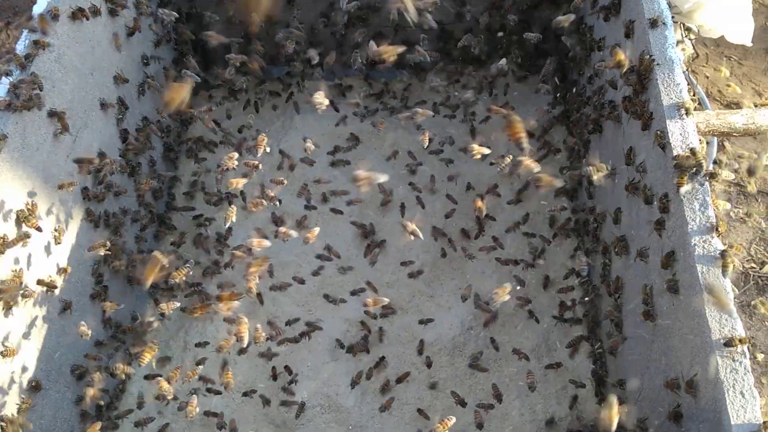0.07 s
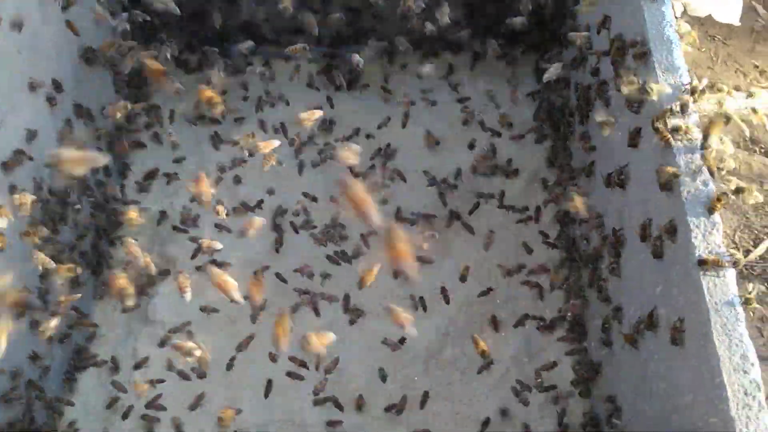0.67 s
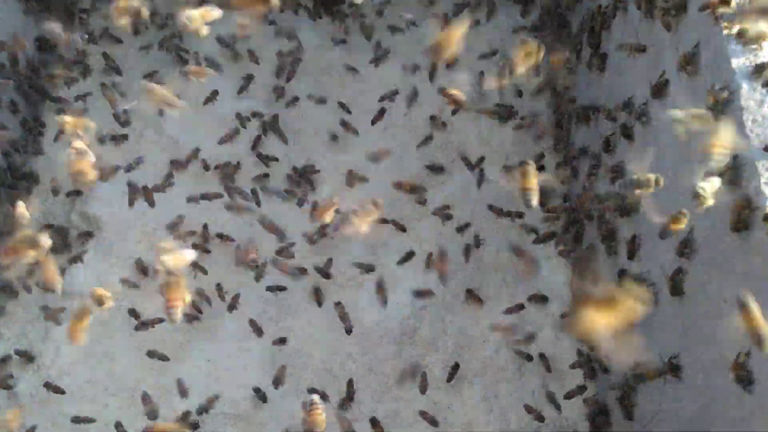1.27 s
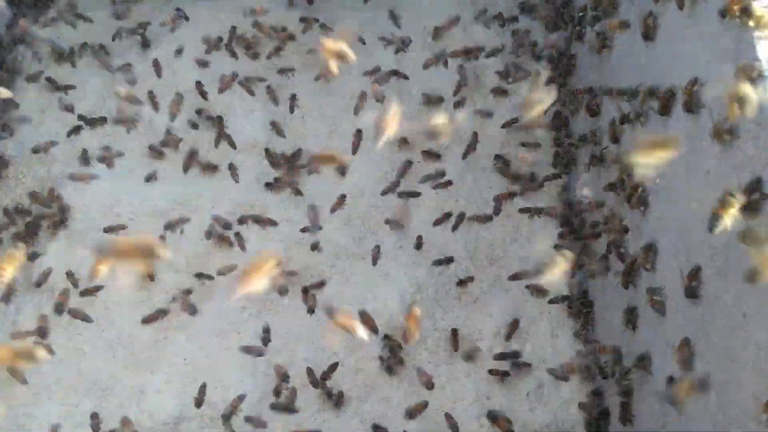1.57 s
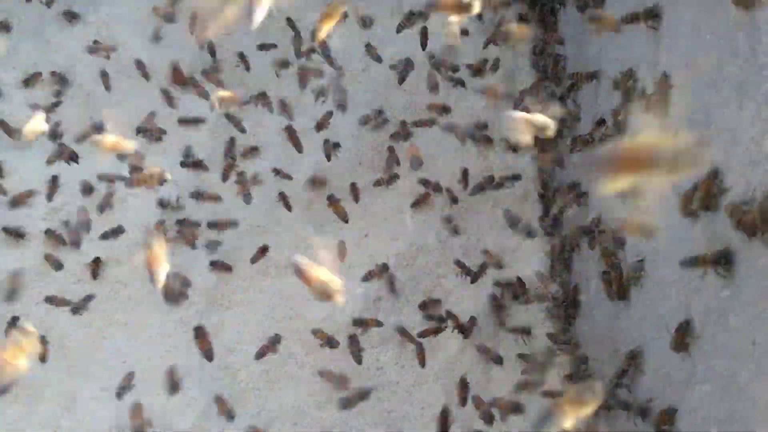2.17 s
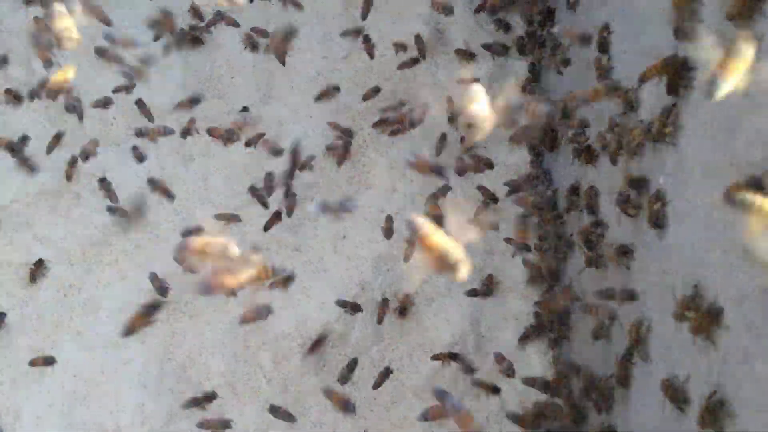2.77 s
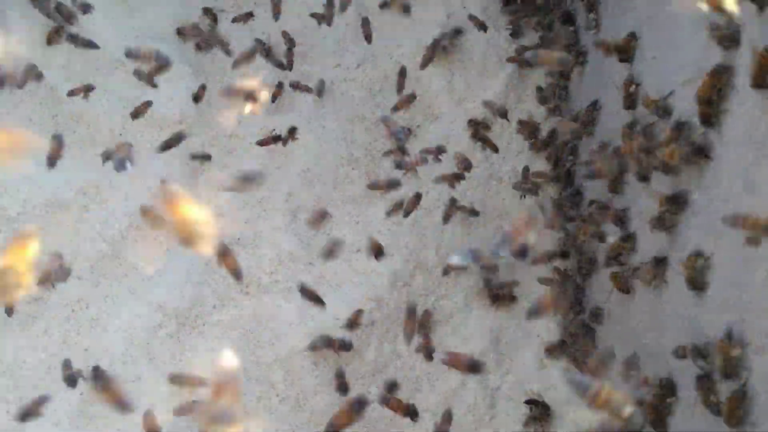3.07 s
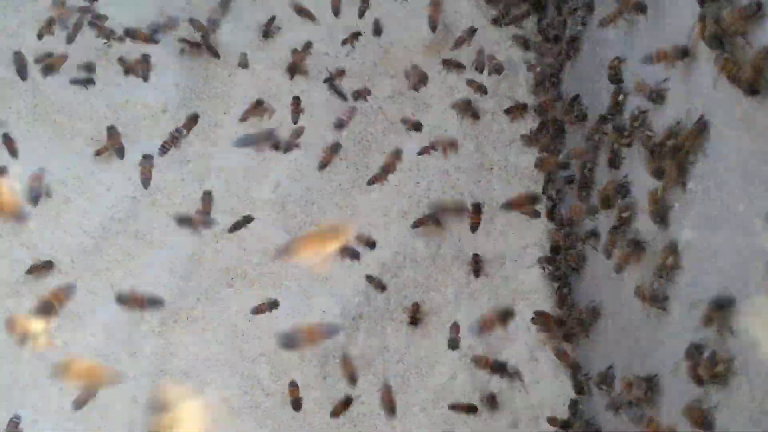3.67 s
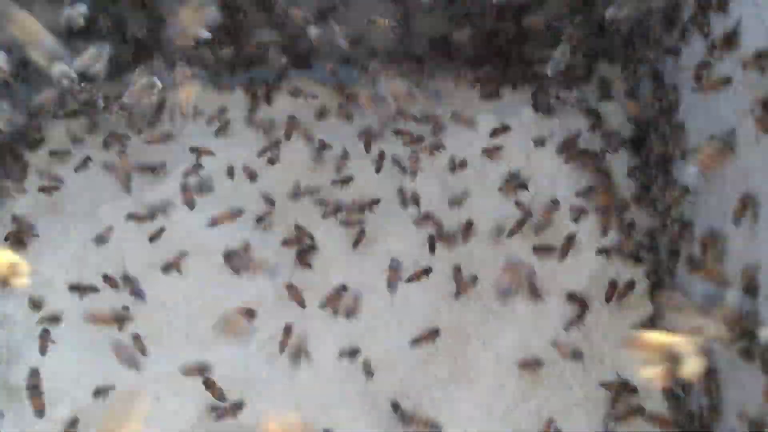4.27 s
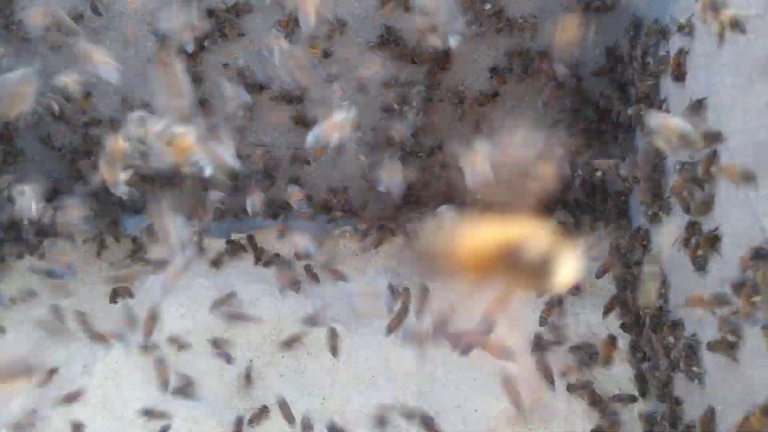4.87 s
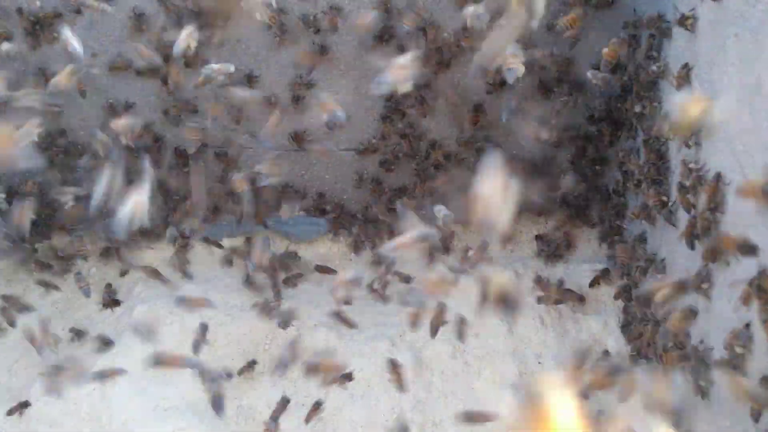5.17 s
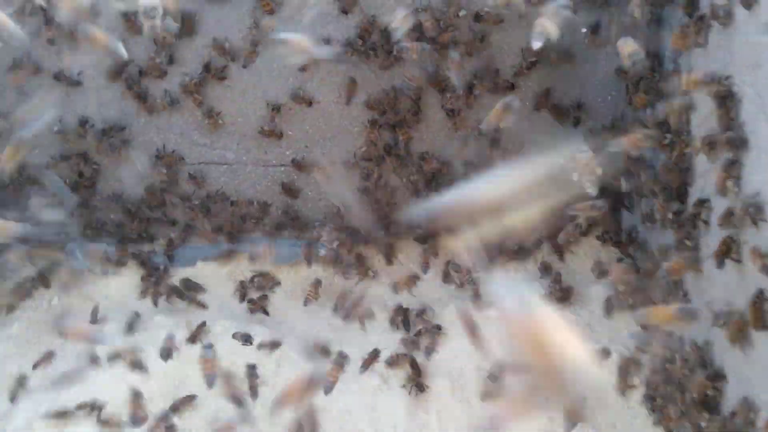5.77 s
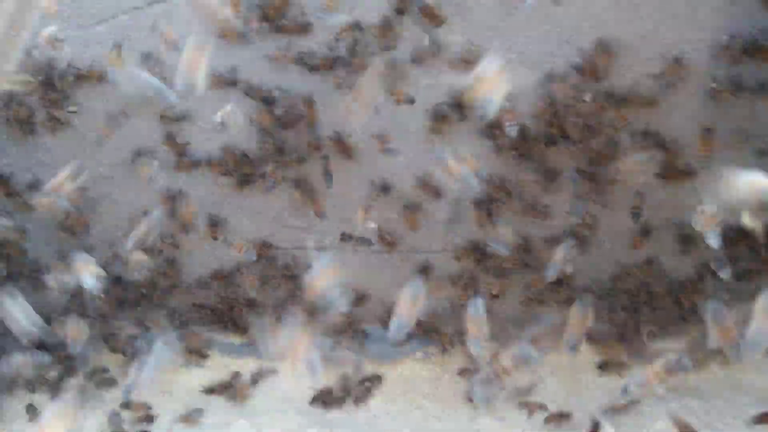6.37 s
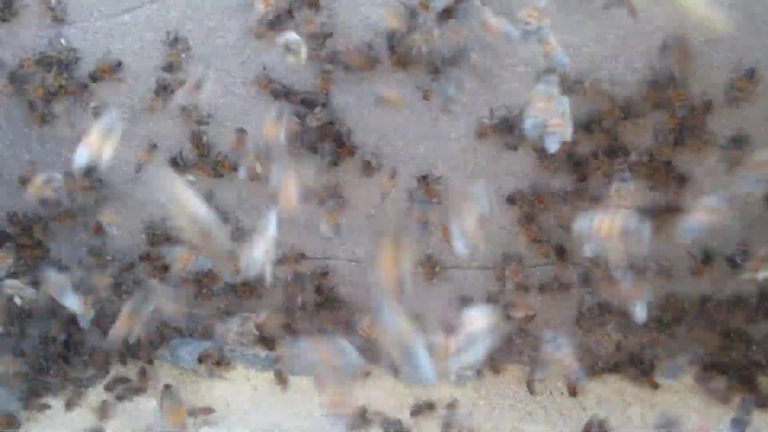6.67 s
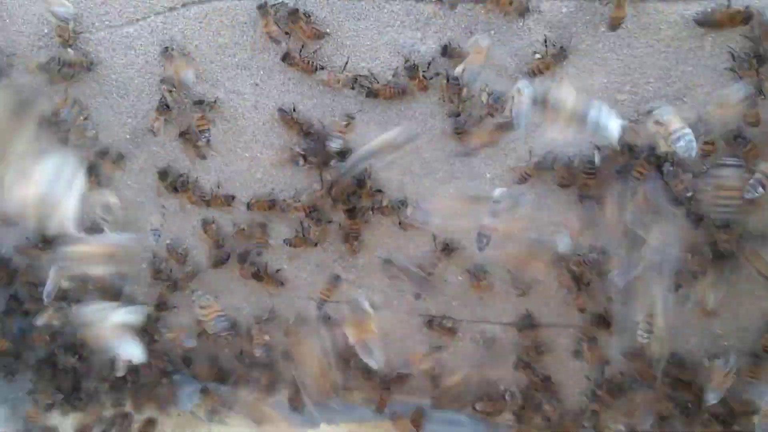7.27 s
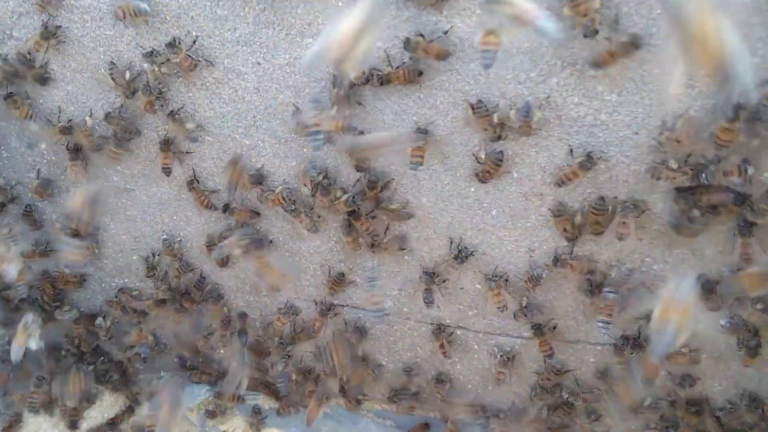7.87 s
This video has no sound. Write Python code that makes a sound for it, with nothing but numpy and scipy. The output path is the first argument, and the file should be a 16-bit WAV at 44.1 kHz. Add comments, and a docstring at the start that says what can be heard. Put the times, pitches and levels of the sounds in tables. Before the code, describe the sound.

A dense swarm of honeybees buzzes all around, with single bees zipping close and puffing air against the microphone.

```python
"""A thick hum of honeybees fills an open box: dozens of wingbeats merging around a camera held among them.
Single bees swing close by, puff air into its two microphone ports (left and right), and one bumps a port.
Behind them, wings hiss, crawling feet tick faintly and stirred air rumbles.
The camera widens the stereo sound by subtracting some of each port from the other. Its gain control
turns everything down at a bump, hard puff or close bee, and the swarm then swells back."""
import sys
import numpy as np
from scipy import signal
from scipy.fft import rfft, irfft, next_fast_len
from scipy.io import wavfile
from scipy.ndimage import uniform_filter1d, map_coordinates

SR = 44100
rng = np.random.default_rng(int(sys.argv[2]) if len(sys.argv) > 2 else 0)


def master_out(mix):
    """Clip the mix to full scale and print it as 16-bit PCM to the path in sys.argv[1]."""
    frames = np.transpose(np.atleast_2d(mix))
    ceiling = np.clip(frames, -1, 1)
    pcm = np.round(ceiling * 32767).astype(np.int16)
    wavfile.write(sys.argv[1], SR, pcm)


N = 353241
TIME = np.arange(N) / SR
SLOW_TIME = np.linspace(0, TIME[-1], 2000)  # coarse steps for slow changes

# The swarm thickens as the camera sinks into the box. Each row: time in seconds, buzz in dB, hiss in dB.
SWARM_LEVELS = [(0.3, -25, -39), (1.2, -22.5, -37), (1.8, -22, -35.5), (2.3, -22, -35.5), (2.9, -20, -32),
                (3.3, -20, -32), (3.7, -20, -32), (3.95, -19.5, -30.5), (4.3, -20.5, -33),
                (4.6, -20, -31.8), (5.6, -20, -32.5), (5.85, -21.5, -33.5), (6.3, -22.5, -33.5),
                (7.05, -19.5, -30.5), (7.5, -23, -33), (8.0, -20, -30)]
# How much the deep hum is boosted within the buzz. Each row: time in seconds, boost in dB.
HUM_BOOST = [(0.3, -10), (1.0, -8.5), (1.7, -6.5), (2.8, -3.5), (3.3, 0.5), (3.9, 2), (4.6, -5), (5.05, -5),
             (5.45, -2), (6.2, 1.5), (6.9, -2.5), (7.4, 1.5), (8.0, 0)]
# Stirred air reaching the ports. Each row: time in seconds, level in dB.
DRAUGHT_LEVELS = [(0.3, -49), (1.1, -58), (1.9, -55), (2.35, -41), (2.62, -47), (3.1, -31), (3.6, -25),
                  (3.8, -30), (4.1, -35), (4.5, -51), (5.2, -43), (5.8, -49), (6.3, -48), (6.6, -39),
                  (7.2, -45), (7.55, -42), (8.0, -43)]

# Bees brushing past. Each row: time in seconds, half length in seconds, dB above the hiss, centre in Hz.
BRUSH_EVENTS = [(0.373, 0.026, -7, 8000), (3.372, 0.055, -3, 9000), (3.46, 0.05, -9.5, 4000),
                (3.996, 0.029, -9, 3800), (4.12, 0.087, -13, 7000)]
# Wing air blown into a port. Each row: time in seconds, half length in seconds, eddy (air swirl) pitch
# in Hz, level in dB, left minus right in dB.
PUFF_EVENTS = [(0.412, 0.011, 129, -20.5, 22), (0.454, 0.012, 100, -24.5, -18),
               (1.746, 0.014, 105, -20.5, -23), (2.124, 0.01, 85, -23, 22), (2.183, 0.013, 85, -25, -21),
               (2.227, 0.011, 85, -30, -19), (2.514, 0.011, 85, -34, -16), (2.778, .01, 90, -29, -16),
               (2.975, 0.014, 181, -13, -26), (3.008, 0.0095, 205, -7, -28), (3.02, 0.0066, 332, -6.5, -32),
               (3.029, 0.02, 100, -11, -25), (3.081, 0.022, 184, -10.5, -21), (3.165, 0.015, 130, -16, -20),
               (3.286, 0.018, 107.7, -19.5, -20), (3.35, .011, 99, -22, -18), (3.45, 0.052, 174, -14, 30),
               (3.509, 0.013, 105, -13, -17), (3.545, 0.019, 183, -8.5, -19), (3.635, .008, 200, -13, 20),
               (3.68, 0.023, 129, -7.5, -23), (3.863, 0.011, 99, -22, 20.5), (3.944, 0.014, 111, -17, -15),
               (4.135, 0.0085, 164, -15.5, 23), (4.292, 0.01, 85, -31, 15), (4.37, 0.014, 85.2, -31, 14),
               (4.571, 0.013, 85, -32, 16), (4.693, 0.0074, 99, -24.5, 17), (5.042, 0.023, 70, -39, 16),
               (5.22, 0.036, 80, -35, -16), (5.501, 0.013, 102, -24, 22), (5.553, 0.016, 101, -25, 22),
               (6.023, .015, 80, -31, -18), (6.441, 0.0094, 85, -34, 16), (6.788, 0.0088, 85, -31, 18),
               (6.954, 0.0096, 100, -24, -18), (7.023, 0.0079, 103, -28, -18), (7.116, 0.017, 90, -28, 20),
               (7.333, 0.025, 110, -24, -18), (7.423, 0.031, 136, -23, 19), (7.483, 0.019, 115, -20, -20),
               (7.536, .015, 128, -27, 23), (7.632, 0.02, 100, -42, -20), (7.847, 0.006, 260, -13, -23),
               (7.869, 0.016, 157, -9, -17)]
# Bees passing close. Each row: time, approach and departure in seconds, wingbeat in Hz, glide in Hz per
# second, level in dB, left minus right in dB, brightness in dB per octave.
CLOSE_PASSES = [(0.385, 0.023, 0.02, 254.3, -19, -23.5, 13, 0),
                (1.356, 0.013, 0.015, 261.5, -27, -24.5, 6, 4.5),
                (1.61, 0.036, 0.025, 249.2, 10, -27, 5, -1), (1.715, 0.039, 0.03, 252, -20.5, -21, 4, -1),
                (1.83, 0.073, .1, 246.2, 19, -28, 15, -2), (2.04, 0.049, 0.035, 263, 39, -27, 30, 0),
                (2.402, 0.066, 0.049, 239.4, -115, -12.5, 44, -0.5),
                (2.789, 0.024, 0.018, 238, 40, -26.5, -7, 1), (2.908, 0.016, 0.011, 247, 0, -18, 6, -0.5),
                (2.95, 0.021, 0.081, 268, 20, -16.5, -13, 0.5),
                (5.23, 0.06, 0.041, 241, 60.5, -20.5, -12, -3), (5.329, 0.041, 0.018, 254, -30, -18, 4, -9),
                (5.47, .03, .02, 250, 11, -22, 8, -14), (5.535, .02, 0.031, 268, 10.5, -21, 12, -4),
                (5.61, 0.074, 0.021, 260.8, -2.5, -32, 6, 9), (5.8, 0.022, .04, 267, 19.5, -14.5, 12, -5),
                (5.968, 0.085, 0.051, 262.2, -14.5, -8.5, 34, 0.5),
                (6.745, 0.03, 0.023, 236, 38, -23.5, -32, -3),
                (7.02, 0.049, 0.038, 270.4, -41.5, -29, -26, 1),
                (7.255, 0.035, 0.028, 286, 41, -20, -23, -3.5),
                (7.33, 0.058, 0.046, 275, -60, -19.5, -43, -1), (7.72, 0.042, 0.028, 252, -1, -25.5, -9, 1),
                (7.82, 0.031, 0.03, 254, -39.5, -21, -30, -5), (7.91, 0.02, 0.032, 258, -30, -16, -30, -14)]

# The tone colour of each sound. Each row: frequency in Hz, relative level in dB.
HISS_TONE = [(70, -21), (140, 3), (220, 11), (370, 8.5), (600, 8), (900, 10), (2000, 0.5), (2900, -1.5),
             (3700, -1), (5000, 1), (7500, -3.5), (9000, -1), (10000, -2.5), (11500, 2), (14000, -1.5)]  # air hissing off wings
RUMBLE_TONE = [(15, -32), (35, -14), (65, -2.5), (100, -5.5), (170, -2.5), (330, -12), (700, -60),
               (2000, -90)]  # big eddies
FLUTTER_TONE = [(30, -28), (100, -27), (170, 2), (300, -2), (550, 0), (1000, -43.5), (2500, -68),
                (6000, -90)]  # small eddies
SWARM_TONE = [(140, -26), (195, 10.5), (255, 0.2), (400, 6), (500, -1.5), (570, -2), (750, -9), (1000, -11),
              (1500, -12.5), (2000, -18), (2500, -17), (3500, -26), (5000, -29)]  # filter over the whole swarm
SIDE_TONE = [(250, -0.5), (500, 1), (750, -4), (1050, -2), (1400, 6.5), (1800, 8), (2300, -1.5)]  # filter over the part of the swarm that differs between the ports
CLOSE_BEE_TONE = [(250, 4), (500, 0.5), (780, -9), (1050, -15.5), (1600, -21.5), (2500, -34), (5000, -54)]  # one close bee
# The tone colour of a puff. Each row: multiple of the eddy pitch, relative level in dB.
PUFF_TONE = [(.2, -17.5), (.6, -1.5), (1, 2.5), (1.5, -10), (2.5, -12.5), (4, -27.5), (8, -44), (20, -90)]

# The left port is duller. Each row: frequency in Hz, left minus right in dB.
PORT_TONE = [(300, 0), (1000, -3), (1800, -9), (3200, 0), (6000, -3), (9000, -5), (14000, -7)]
# Stereo widening. Each row: frequency in Hz, share of the other port to subtract.
CROSSFEED_SHARE = [(100, 0.85), (1200, 0.88), (3700, 0.58), (6200, 0.23), (10000, 0.071)]


def amp(db):
    """Turn decibels into a gain."""
    return 10 ** (np.asarray(db) / 20)


def unit(x):
    """Scale x to an average (rms) level of 1."""
    return x / np.sqrt(np.mean(x ** 2) + 1e-20)


def along(points, hz):
    """Read a table between its rows, on a log frequency scale."""
    row_hz, values = np.transpose(points)
    return np.interp(np.log(hz + 1), np.log(row_hz + 1), values)


def curve(rows, column=1):
    """Stretch a column of a time table to one value per sample."""
    columns = np.transpose(rows)
    return np.interp(TIME, columns[0], columns[column])


def drift(rate):
    """A smooth random curve on the coarse steps, through `rate` random values a second."""
    return map_coordinates(rng.standard_normal(size=1024), [SLOW_TIME * rate], mode="wrap")


def wobble(rate):
    """A drift with one value per sample."""
    return np.interp(TIME, SLOW_TIME, drift(rate))


def filtered(x, response):
    """Multiply each frequency in x by response(hz)."""
    size = next_fast_len(N + SR // 4)
    return irfft(rfft(x, size) * response(np.fft.rfftfreq(size, 1 / SR)), size)[..., :N]


def coloured(x, tone):
    """Give x a tone colour and an average level of 1."""
    return unit(filtered(x, lambda hz: amp(along(tone, hz))))


def pan(db):
    """Left and right gains, db apart, with constant total power."""
    gains = amp(np.array([db / 2, -db / 2])).reshape(2, -1)
    return gains / np.sqrt(np.mean(gains ** 2, axis=0))


def rustle(tick_db=-13, ticks_per_s=220, flicker_db=0.8):
    """Air hisses off the wings; feet and wings tick against the walls."""
    air = coloured(rng.standard_normal((2, N)), HISS_TONE) * amp(flicker_db * wobble(25))
    contacts = (rng.random((2, N)) < ticks_per_s / SR) * rng.standard_normal((2, N))
    ticks = amp(tick_db) * coloured(contacts, HISS_TONE)
    return amp(curve(SWARM_LEVELS, column=2)) * (air + ticks)


def brushes(width_octaves=0.77):
    """A bee brushing past makes a short, high swish."""
    out = np.zeros((2, N))
    for at, half, db, centre_hz in BRUSH_EVENTS:
        noise = rng.standard_normal((2, N))
        swish = filtered(noise, lambda hz: np.exp(-(np.log2((hz + 1) / centre_hz) / width_octaves) ** 2 / 2))
        swell = np.exp(-((TIME - at) / half) ** 2 / 2)
        out += amp(db) * unit(swish) * swell
    return amp(curve(SWARM_LEVELS, column=2)) * out


def draught(flutter_db=-1, breakup_db=-20, gust_db=4):
    """Wing air rumbles at each port in random gusts; a strong draught breaks into small, bright eddies."""
    db = curve(DRAUGHT_LEVELS) + gust_db * wobble(14)
    lumps = amp(1.9 * np.array([wobble(45), wobble(40)]))
    rumble = unit(lumps * coloured(rng.standard_normal((2, N)), RUMBLE_TONE))
    flutter = unit(lumps * coloured(rng.standard_normal((2, N)), FLUTTER_TONE))
    breakup = np.tanh(amp(db - breakup_db))
    return amp(db) * (rumble + amp(flutter_db) * breakup * flutter)


def puffs(smooth_s=0.011, size=16384):
    """A bee right at a port blows a short blast: an even stream of eddies that swells and fades."""
    out = np.zeros((2, N))
    hz = np.fft.rfftfreq(size, 1 / SR)
    for at, half, eddy_hz, db, side_db in PUFF_EVENTS:
        near = np.flatnonzero(abs(TIME - at) < size / SR / 2)[:size]
        swell = np.exp(-((TIME[near] - at) / half) ** 2 / 2)
        spectrum = rfft(rng.standard_normal(size)) * amp(along(PUFF_TONE, hz / eddy_hz))
        eddies = unit(irfft(spectrum))
        power = uniform_filter1d(abs(signal.hilbert(eddies)) ** 2, int(smooth_s * SR))
        even_stream = eddies / np.sqrt(power)
        blast = swell * even_stream[:len(near)]
        out[:, near] += amp(db) * pan(side_db) * blast * np.linalg.norm(swell) / np.linalg.norm(blast)
    return out


def knock(at_s=2.960, pitch_hz=228, db=3, side_db=-34):
    """A bee bumps the right port: one dry, low push with no ring."""
    phase_squared = (np.pi * pitch_hz * (TIME - at_s)) ** 2
    return amp(db) * pan(side_db) * (1 - 2 * phase_squared) * np.exp(-phase_squared)


def close_bees(turn_db_per_octave=1.8, jitter=0.01, shimmer_db=1.6, harmonic_count=14):
    """A close bee swells as it nears and fades as it veers off, its pitch gliding as it turns."""
    out = np.zeros((2, N))
    steering = .008 * wobble(35)
    waver = steering + jitter * wobble(150)
    stroke_gain = amp(shimmer_db * wobble(110))  # no two wing strokes are quite alike
    harmonics = np.arange(1, harmonic_count + 1)[:, None]
    for at, approach, departure, wing_hz, glide, db, side_db, brightness in CLOSE_PASSES:
        near = abs(TIME - at) < .7
        t = TIME[near] - at
        beats = np.cumsum((wing_hz + glide * t) * (1 + waver[near])) / SR
        progress = t / np.where(t < 0, approach, departure)
        tilt = brightness + turn_db_per_octave * np.tanh(progress)  # dull head-on, brighter from behind
        gains = amp(along(CLOSE_BEE_TONE, wing_hz * harmonics) + np.log2(harmonics) * tilt)
        phases = 2 * np.pi * harmonics * beats + 0.53 * rng.standard_normal((harmonic_count, 1))
        tone = (gains * np.cos(phases)).sum(axis=0) / np.sqrt((gains ** 2).sum(axis=0) / 2)
        swell = (1 + progress ** 2 / 2) ** -2
        out[:, near] += amp(db) * pan(side_db) * swell * stroke_gain[near] * tone
    return out


def wingbeat(harmonic_count=18, scatter_db=2, scatter_radians=1.097, size=2048):
    """One wingbeat is a pressure pulse; its harmonics get random levels and phases."""
    gains = amp(scatter_db * rng.standard_normal(harmonic_count))
    phases = scatter_radians * rng.standard_normal(harmonic_count)
    return unit(irfft(np.r_[0, gains * np.exp(1j * phases)], size))


def flying_bee(wing_hz, side_db):
    """One bee of the swarm: its pitch wanders as it steers, its loudness as it comes and goes."""
    hz = wing_hz * np.exp(.05 * np.tanh(.9 * drift(6)) + .016 * drift(30))
    beats = np.interp(TIME, SLOW_TIME, np.cumsum(hz) * SLOW_TIME[1] + rng.random())
    nearness_db = 8.5 * np.tanh(0.69 * drift(7))
    facing_db = 1.8 * drift(30)  # wings beam their sound, so it flickers as the bee swerves
    cycle = wingbeat()
    lag_s = 4e-5 + 1.5e-4 * rng.standard_normal()  # its direction sets the delay at the right port
    port_beats = np.array([beats, beats - lag_s * wing_hz])
    buzz = cycle[(port_beats * len(cycle)).astype(int) % len(cycle)]
    return buzz * pan(side_db) * np.interp(TIME, SLOW_TIME, amp(nearness_db + facing_db))


def swarm(wing_hz=255.1, spread=.046, slow_tail=.005, sides_db=7, count=56):
    """Many bees beat their wings at nearly one rate, a few slower; their harmonics merge into a rasp."""
    haste = unit(np.arctanh(.93 * np.linspace(-1, 1, count)))
    rates = wing_hz * np.exp(spread * haste - slow_tail * np.minimum(haste, 0) ** 2)
    left, right = sum(flying_bee(hz, side_db=(-1) ** k * sides_db * abs(rng.standard_normal()))
                      for k, hz in enumerate(rates))
    middle = left + right
    side = filtered(left - right, lambda hz: amp(along(SIDE_TONE, hz)))
    buzz = coloured(np.array([middle + side, middle - side]), SWARM_TONE)
    hum = filtered(buzz, lambda hz: 1 / (1 + (hz / 540) ** 2) ** 2)  # the low part of the buzz
    return amp(curve(SWARM_LEVELS)) * (buzz + (amp(curve(HUM_BOOST)) - 1) * hum)


def scene():
    """All the sounds as they reach the two ports."""
    return swarm() + close_bees() + rustle() + brushes() + draught() + puffs() + knock()


def gain_control(x, ceiling_db=-10.5, average_s=0.0037, recover_db_per_s=8):
    """The gain drops at once when the louder channel passes the ceiling, then creeps steadily back."""
    keep = np.exp(-1 / (average_s * SR))
    power = signal.lfilter([1 - keep], [1, -keep], x ** 2).max(axis=0)
    excess_db = np.maximum(10 * np.log10(power + 1e-20) - ceiling_db, 0)
    recovered_db = recover_db_per_s * TIME
    return x * amp(recovered_db - np.maximum.accumulate(excess_db + recovered_db))


def record(dry):
    """The camera trims the bass and top treble, widens the stereo, fades in and ducks loud moments."""
    low_cut_hz, top_hz = 33, 14280
    port_delay_s = .0004  # sound's travel time between the ports
    open_s, open_db, fade_in_s = 0.08, -22.5, 0.27  # the input opens quietly and fades up
    ports = filtered(dry, lambda hz: pan(along(PORT_TONE, hz)) * (1 - np.exp(-(hz / low_cut_hz) ** 4)))
    other_port = filtered(
        ports[::-1], lambda hz: along(CROSSFEED_SHARE, hz) * np.exp(-2j * np.pi * hz * port_delay_s))
    rise = np.clip((TIME - open_s) / fade_in_s, 0, 1) ** 1.16
    fade_in = (TIME > open_s) * np.minimum(amp(open_db) + rise, 1)
    wide = gain_control((ports - other_port) * fade_in)
    rounded = wide / (1 + (wide / .9) ** 8) ** (1 / 8)  # the hardest peaks are softly rounded off
    return filtered(rounded, lambda hz: hz < top_hz)


dry = scene()
out = record(dry)
master_out(out)
```